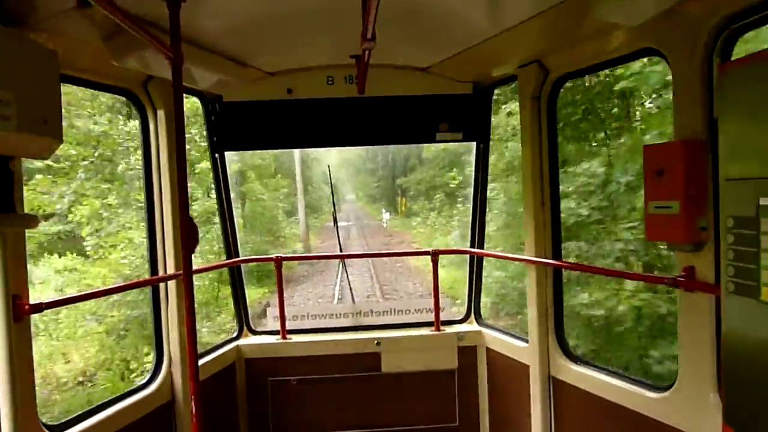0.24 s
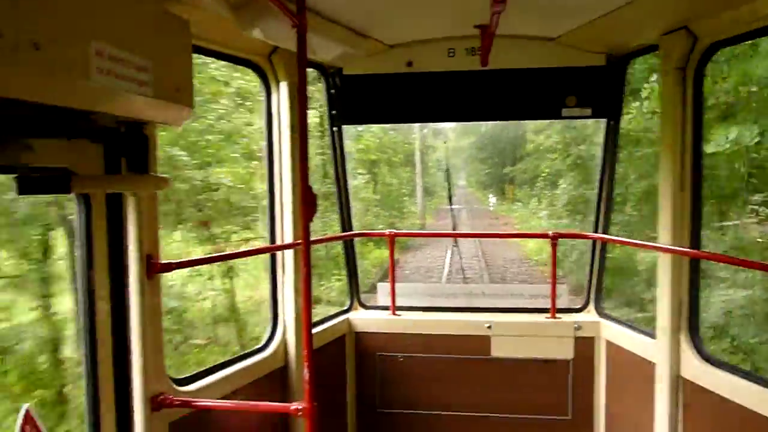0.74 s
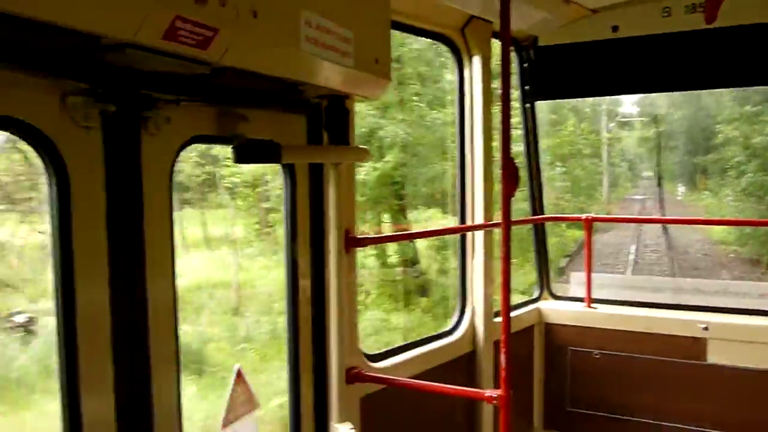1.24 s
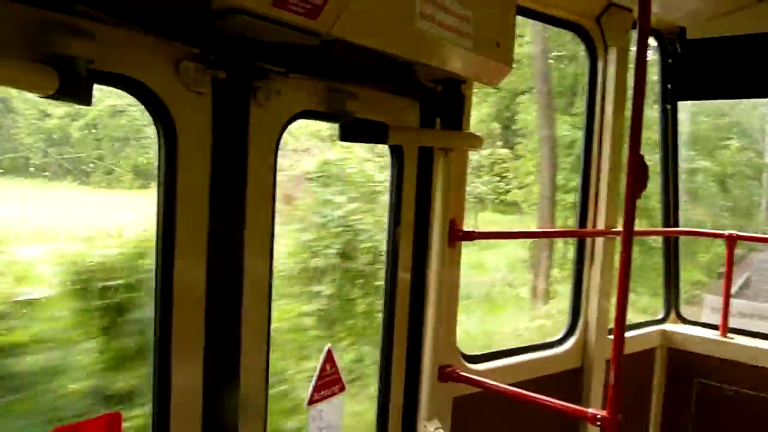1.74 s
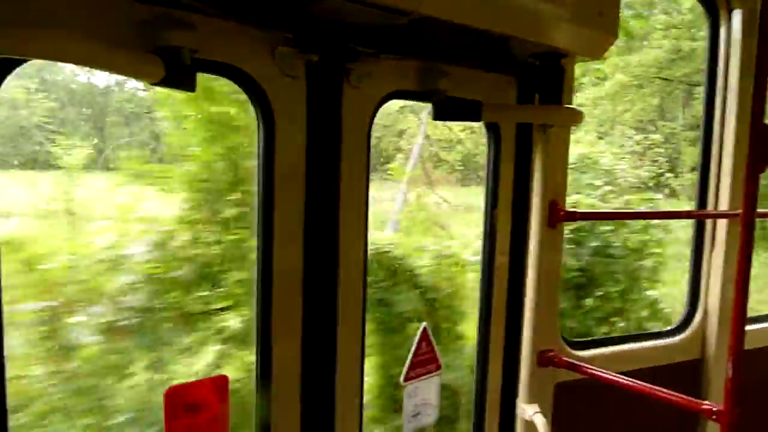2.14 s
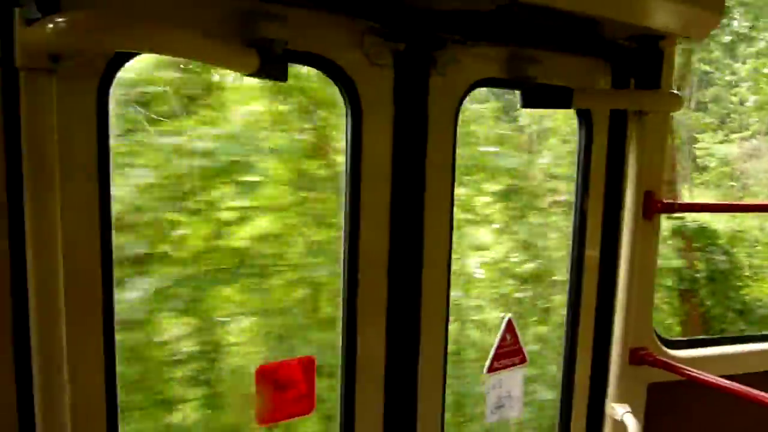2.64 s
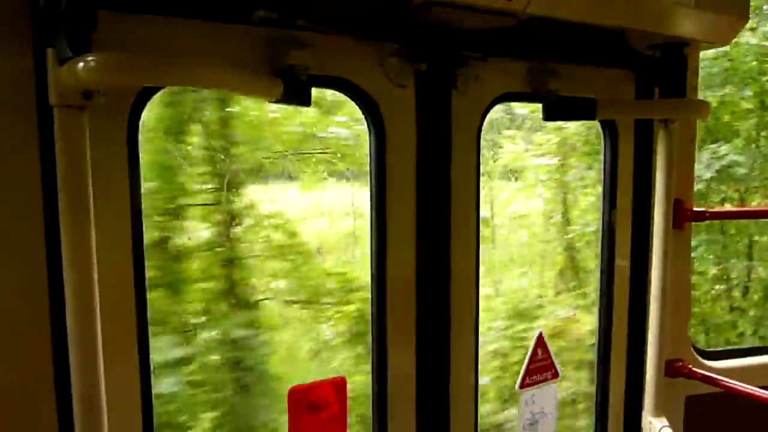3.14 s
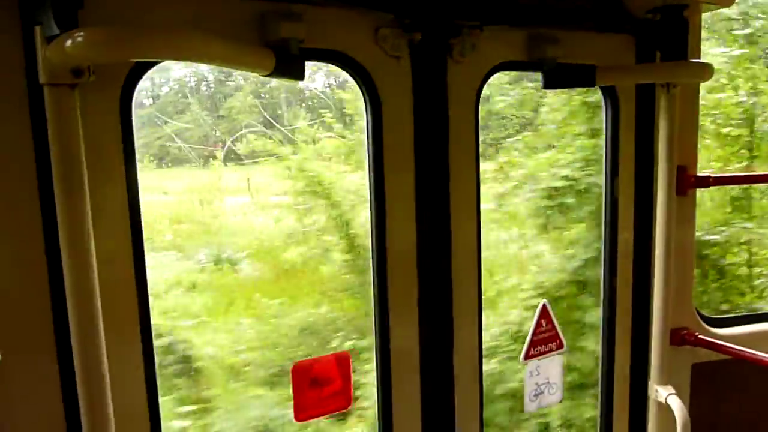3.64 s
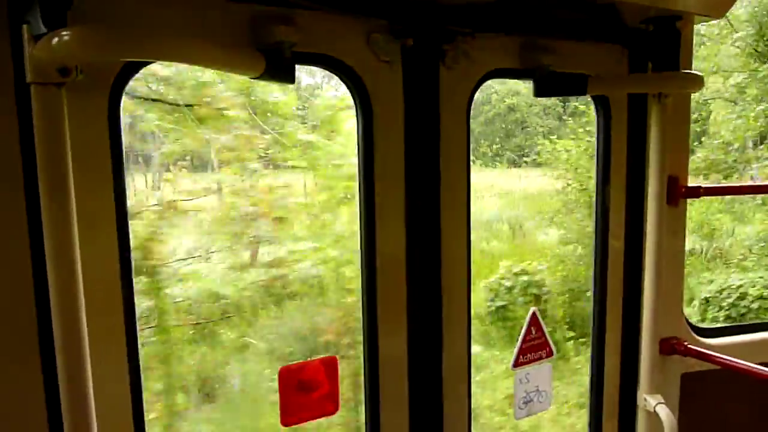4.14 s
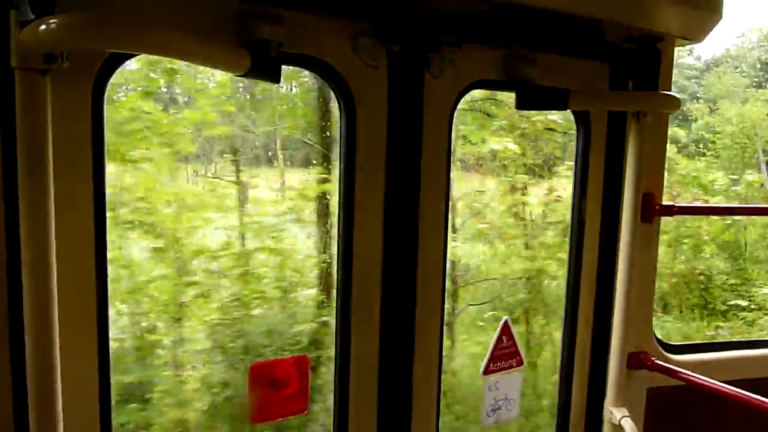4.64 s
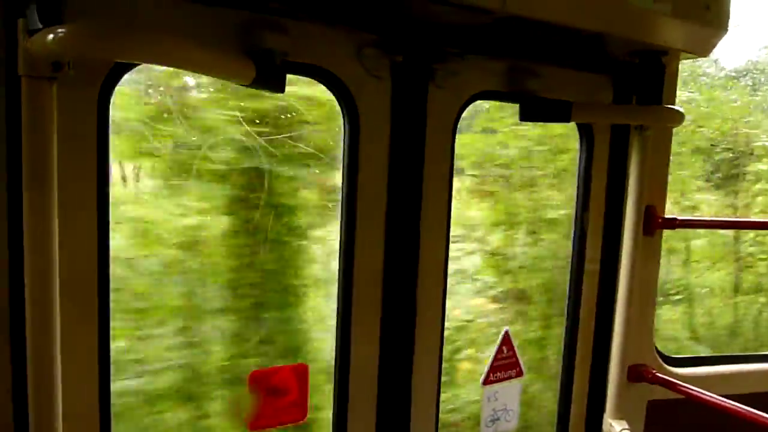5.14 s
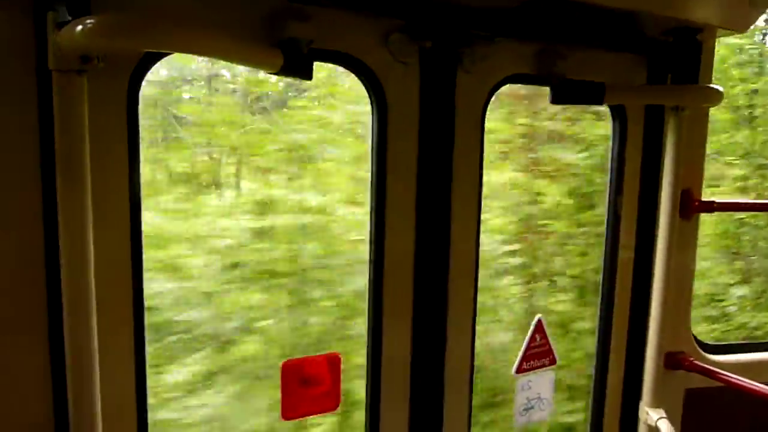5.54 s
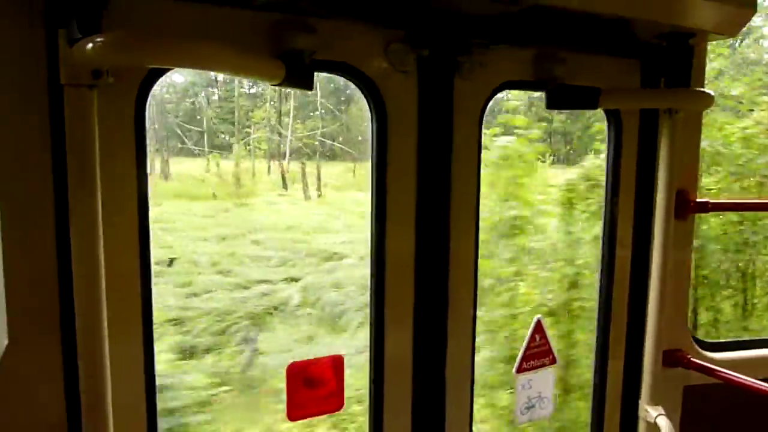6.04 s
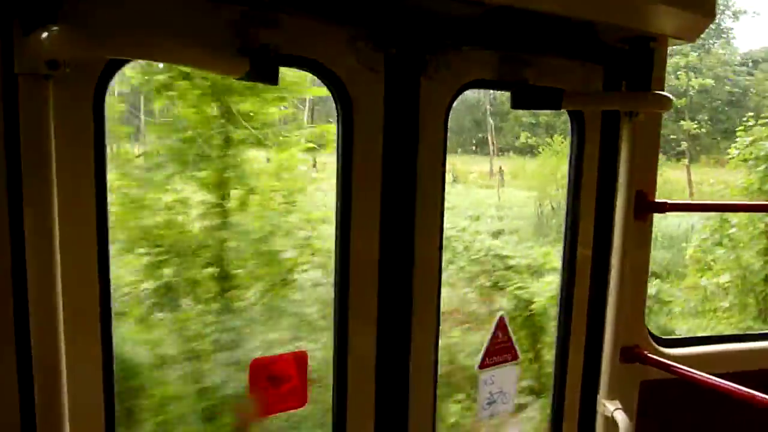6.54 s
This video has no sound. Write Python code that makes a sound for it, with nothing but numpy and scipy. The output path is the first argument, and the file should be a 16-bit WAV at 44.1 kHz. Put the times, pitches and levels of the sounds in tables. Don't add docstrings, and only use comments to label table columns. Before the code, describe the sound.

A tram runs at constant speed through woodland, heard from inside the car. Wheels on rough rail make a wide, dark roar over a wavering deep cabin boom, with loose panels murmuring and a thin, barely audible wheel whine. Wheel hiss rises midway, then eases; a short, faint squeak comes after four seconds. Passing foliage adds subtle puffs of hiss. Close, enclosed mono camera sound.

```python
import sys
import numpy as np
from scipy import signal
from scipy.fft import rfft, irfft
from scipy.io import wavfile
from scipy.ndimage import uniform_filter1d

SR = 44100
rng = np.random.default_rng(int(sys.argv[2]) if len(sys.argv) > 2 else 0)


def to_wav(s):
    ch = np.atleast_2d(s).T
    pcm = np.round(np.clip(ch, -1, 1) * 32767)
    wavfile.write(sys.argv[1], SR, pcm.astype(np.int16))


def boost(x):
    u = np.asarray(x, float) / 20
    return 10 ** u


N = 299086

# time_s, rail_roughness_db, body_shaking_db
RIDE = [(0, -2, 0), (.5, -1, -3.5), (.85, 0, -3), (1.26, 2, -1.5), (1.45, 0, -0.5), (1.75, 1, 1.5),
        (1.95, -2, 1), (2.1, -1, 0), (2.4, 3.5, 0), (2.75, 6, 0.5), (3.1, 1.5, 0), (3.5, 3, -1),
        (3.95, 3, -0.5), (4.5, 1, -1), (5.0, 0.5, -1), (5.6, -3, -2.5), (6.2, -4, -1), (6.78, -1.5, 1)]
PART_HZ = [
    170,
    600,
    2200,
    4500,
    6500,
]
PART_SHARES = [
    (0.11, 0.16, 0.47, 0.046, 1, .1),
    (0.26, 0.99, 0.98, .1, .1, 0.97),
    (0.82, 0.091, 1.0, 0.37, .02, .05),
    (0.51, .1, 0.26, 0.52, .01, .01),
    (.6, .05, 0.6, 0.61, .01, .01),
]
# frequency_hz, density_db
ROAR_SPECTRUM = [(47, -30), (80, -1), (162, -7), (387, -6.5), (477, -14), (964, -18), (1460, -25),
                 (2270, -26), (2540, -29.5), (2850, -30), (3190, -35), (3930, -38), (5640, -44),
                 (6570, -56), (7500, -68), (9750, -102), (16500, -120)]
# centre_hz, width_hz, gain_db
BODY_MODES = [(92, 11, 0.5), (125.8, 9.1, 4.5), (136, 6.4, 4.5), (157, 7.3, -0.5), (176, 38, 3),
              (198, 28, 1.5), (227, 11, -0.5), (245.3, 2.2, 4), (262.5, 5.9, 2), (294, 12, 3),
              (311, 3.2, 6), (391.5, 13, 2.5), (410, 30, 1), (444.6, 4.8, 6.5), (463, 21, -2.5),
              (580, 13, 3), (520, 25, 1.5), (610, 22, 2.5), (691, 18, 4), (780, 21, 0.5), (939, 34, 3),
              (995, 19, 3), (1080, 40, 4), (2230, 25, 2.5), (2334, 230, 3), (2370, 42, -1), (2530, 140, -2),
              (2870, 200, 2), (3880, 580, 3.5), (5360, 200, -2)]
# middle_s, length_s, level_db
TRACK_MARKS = [(.64, 0.026, 3), (1.56, 0.035, 0.5), (1.88, 0.035, 0.5), (3.18, 0.061, -2),
               (3.23, 0.024, -0.5), (3.31, .1, -5), (3.97, 0.086, 0.5), (4.09, 0.11, -1.5),
               (4.26, 0.068, 1), (4.32, 0.071, -3), (4.85, 0.046, 2.5), (5.11, 0.067, -2),
               (5.55, 0.055, 3.5), (5.64, 0.053, 1), (6.06, 0.068, -4), (6.2, 0.063, -1), (6.29, 0.04, 0)]
# middle_s, length_s, level_db
NEAR_FOLIAGE = [(0.486, 0.12, 2), (1.24, 0.26, 5.5), (1.478, 0.028, 5), (1.614, 0.25, 3), (2.286, 0.13, 2),
                (2.71, 0.11, 1), (2.817, .05, -1.5), (3.087, 0.066, 4), (3.23, 0.053, 5), (3.555, 0.12, 0),
                (3.931, 0.13, 5), (4.24, 0.12, 2), (4.365, 0.056, 1.5), (4.49, 0.048, -0.5),
                (5.418, 0.03, 3), (5.541, 0.24, 6.5), (5.805, 0.086, 6), (6.006, .06, 4),
                (6.087, 0.085, 3.5), (6.15, 1, 5.5), (6.206, 0.078, 6.5), (6.436, 0.11, 2),
                (6.605, 0.05, 6)]
# middle_s, length_s, level_db
FLOOR_HEAVES = [(0.318, 0.066, -3), (0.615, 0.11, -6), (1.249, 0.2, 0.5), (1.677, 0.11, 1),
                (2.057, 0.07, 2), (2.337, 0.09, 3.5), (2.784, 0.13, 2.5), (3.193, 0.12, -2.5),
                (3.379, .08, -1), (3.488, 0.091, 4), (3.764, 0.068, 4.5), (3.942, 0.089, 4), (4.076, .1, 0),
                (4.394, 0.25, 2.5), (4.7, 0.13, 3.5), (4.985, 0.091, 3.5), (5.187, .06, 3),
                (5.365, 0.063, 3.5), (5.65, .08, -3), (5.92, 0.29, 2.5), (6.195, .06, 0),
                (6.445, 0.08, -2.5), (6.6, .2, 1.5)]
# middle_s, length_s, level_db
WALL_KNOCKS = [(.32, .08, 2.5), (0.55, .15, 2.5), (0.787, .05, 4), (1.05, .2, 1), (1.383, .1, -2),
               (1.554, .08, 1.5), (1.79, .06, 1), (1.88, .1, -4.5), (2.047, .08, 1), (2.758, .15, -2),
               (3.05, .12, 2), (3.322, .06, 0.5), (3.422, .05, -5.5), (3.76, .1, 2), (3.979, .1, 3),
               (4.366, .1, -3.5), (4.746, .1, 1.5), (4.87, .06, 2.5), (5.039, .06, 3.5), (5.36, .1, 3),
               (5.652, .15, -2.5), (6.045, .08, 1.5), (6.172, .06, 2.5), (6.335, .08, 1.5)]
# middle_s, length_s, peak_db, pitch_hz
BOOM_SWELLS = [(0.092, 0.17, -31, 71), (0.261, 0.13, -32, 64.7), (0.451, 0.27, -34, 67.1),
               (0.621, .1, -33, 70.5), (0.796, 0.16, -30, 67), (0.953, 0.15, -32, 66),
               (1.13, 0.15, -31, 64.8), (1.449, 0.23, -28.5, 67.7), (1.588, 0.019, -34, 65.7),
               (1.771, 0.21, -30, 67.5), (1.963, 0.083, -27.5, 67.2), (2.153, 0.17, -37, 67.6),
               (2.401, 0.16, -36, 65.1), (2.575, 0.18, -35.5, 66.2), (2.766, 0.15, -28.5, 67.7),
               (2.943, 0.074, -25, 66.3), (3.198, 0.35, -25.5, 61.87), (3.481, 0.065, -42, 63.3),
               (3.642, 0.091, -27.5, 67.7), (4.003, 0.07, -25.5, 68.1), (4.159, 0.15, -31, 63.5),
               (4.307, 0.17, -25.5, 63.4), (4.683, 0.11, -28, 64.7), (4.825, 0.13, -31.5, 63.2),
               (5.081, 0.028, -22, 65.7), (5.231, 0.27, -30, 66.3), (5.421, 0.16, -29, 67.26),
               (5.579, 0.11, -24, 65.86), (5.763, 0.16, -27.5, 65.4), (6.041, 0.062, -21.5, 65.96),
               (6.268, 0.45, -32, 64.16), (6.5, .1, -34, 65.5), (6.648, 0.12, -29, 64.5),
               (6.78, 0.056, -24, 64.1)]
# centre_hz, width_hz, unevenness, level_db
HUM_MODES = [
    (218, 10, .4, -2.5),
    (548, 30, 1.5, -5.5),
    (395, 70, 2.5, -3),
    (138, 25, .8, -3),
    (290, 50, 2, -3),
    (100, 18, .8, -3),
    (255, 24, 1.2, -3),
]
# middle_s, length_s, peak_db
HUM_LOW = [(0.538, .08, -34.5), (1.023, 0.13, -41.5), (1.24, 0.094, -42), (1.657, 0.52, -37.5),
           (2.186, 0.25, -34.5), (2.75, 0.11, -45), (3.226, 0.059, -34), (3.743, 0.13, -34),
           (3.992, 0.095, -33), (4.362, 0.12, -37.5), (4.684, 0.11, -30), (5.071, 0.14, -40.5),
           (5.452, 0.24, -38.5)]
HUM_HIGH = [(.17, 0.23, -44), (.44, 0.057, -45), (1.62, 0.36, -51), (2.15, .12, -43), (2.799, 0.098, -44),
            (3.23, 0.039, -34), (3.382, 0.067, -29), (3.74, 0.088, -50), (3.98, 0.07, -29),
            (4.24, 0.05, -33.5), (5.6, 0.16, -42), (5.85, 0.076, -38), (6.14, 0.15, -40.5),
            (6.4, 0.17, -39), (6.72, 0.1, -45)]
HUM_MID = [(.3, 0.091, -50), (.55, 0.26, -36.5), (.95, 0.091, -42), (1.32, 0.32, -43), (2.05, 0.13, -37),
           (3.0, 0.24, -52), (3.45, 0.11, -40), (4.0, 0.11, -52), (4.25, 0.11, -49), (4.9, 0.22, -40.5),
           (5.3, 0.11, -64), (6.3, 0.16, -37.5)]
HUM_DEEP = [(.5, 0.19, -37), (1.3, 0.091, -26), (2.1, 0.15, -51), (2.55, 0.21, -32.5), (2.97, 0.22, -35),
            (3.55, 0.1, -33.5), (3.8, 0.14, -38), (4.4, 0.11, -29.5), (4.68, 0.09, -44), (5.03, .1, -33),
            (6.3, 0.099, -46)]
HUM_DOOR = [(.45, 0.14, -51), (0.86, 0.13, -32.5), (1.677, 0.17, -33.5), (2.346, .15, -44),
            (2.726, .16, -37.5), (3.604, 0.16, -37), (3.85, 0.23, -43.5), (4.005, 0.056, -38),
            (4.819, .14, -36), (5.351, .15, -37), (6.647, 0.25, -35.5)]
HUM_FLOOR = [(.7, .08, -37), (1.5, 0.071, -36), (1.78, 0.19, -29), (2.76, 0.12, -38), (3.55, 0.11, -45),
             (3.95, .15, -35), (4.6, .12, -41), (5.5, 0.17, -41.5), (6.05, .1, -43), (6.72, .1, -36)]
HUM_SEAT = [(1.1, .12, -42), (1.75, 0.13, -40), (2.3, 0.13, -41), (2.75, 0.31, -39.5), (3.4, 0.23, -44.5),
            (3.95, 0.22, -38), (4.55, 0.13, -38), (5.35, 0.18, -37), (5.9, .12, -41)]
WHEEL_HZ = [
    1584.6,
    1900.6,
]
# middle_s, length_s, peak_db
SING_LOW = [(0.05, 0.6, -49.5), (.45, 0.42, -60), (0.752, .25, -58), (1.05, 0.1, -54), (1.402, 0.25, -52),
            (1.72, .2, -62), (2.468, 0.12, -51), (2.72, .1, -57), (2.97, 0.13, -52), (3.247, 0.16, -54),
            (3.678, 0.21, -45), (3.864, .16, -50), (4.2, 0.21, -48), (4.403, 0.21, -51.5),
            (4.65, 0.37, -56), (4.9, .25, -54.5), (5.098, 0.22, -49), (5.235, 0.15, -50),
            (5.452, 0.37, -48.5), (5.801, 0.19, -50.5), (6.021, .3, -52.5), (6.301, 0.22, -54),
            (6.521, 0.14, -52), (6.717, 0.19, -50.5)]
SING_HIGH = [(0.46, 0.2, -54), (.7, .3, -58.5), (1.0, 0.15, -55), (1.2, 0.26, -46.5), (1.39, .16, -49),
             (1.58, 0.25, -54.5), (1.85, .15, -57), (2.25, 0.21, -53), (2.55, 0.2, -48.5),
             (2.76, 0.14, -54), (3.55, 0.2, -47.5), (3.75, .25, -50), (3.94, 0.1, -46), (4.22, 0.3, -46.5),
             (4.5, .3, -55.5), (4.78, .15, -54), (4.91, 0.12, -50), (5.35, 0.25, -55), (5.65, .3, -57),
             (6.4, .2, -56), (6.62, 0.2, -49), (6.76, .1, -54)]
# slip_s, peak_db
SLIPS = [(4.336, -53), (4.3566, -51), (4.372, -66), (4.3875, -45), (4.402, -53), (4.418, -54),
         (4.4323, -54), (4.449, -49), (4.4618, -50), (4.4815, -45), (4.497, -65), (4.509, -59),
         (4.522, -57), (4.546, -62), (4.575, -57), (4.6001, -56), (4.6194, -62), (4.69, -68)]
# middle_s, length_s, peak_db
TWIG_SWISHES = [(5.415, .02, -60), (5.47, .05, -55), (5.55, .08, -52), (5.72, .12, -60), (5.99, .04, -63),
                (6.1, 0.055, -61), (6.21, .04, -58), (6.33, .06, -58), (6.45, .05, -62)]


def evened(x):
    return x / np.sqrt(np.mean(abs(x) ** 2) + 1e-20)


def columns(rows, t):
    time_s, *values = np.transpose(rows)
    return [np.interp(t, time_s, v) for v in values]


def bumps(rows, heights, t):
    grid = np.linspace(t[0], t[-1], num=3000)
    humps = [np.exp(-abs(2 * (grid - row[0]) / row[1]) ** 2.0) for row in rows]
    return np.interp(t, grid, heights @ np.array(humps))


def level_bumps(rows, t):
    return bumps(rows, np.transpose(rows)[2], t)


def spells(rows, t, rest_db):
    return boost(rest_db) + bumps(rows, boost(np.transpose(rows)[2]), t)


def drift(width_hz):
    r = np.exp(-np.pi * width_hz / SR)
    z = rng.standard_normal(N + SR) + 1j * rng.standard_normal(N + SR)
    for _ in range(2):
        z = signal.lfilter([1], [1, -r], z)
    return evened(z[SR:])


def note(hz, fuzz, width_hz):
    turn = np.exp(2j * np.pi * np.cumsum(hz * np.ones(N)) / SR)
    return evened((turn * (1 + fuzz * drift(width_hz))).real)


def noise_band(centre_hz, width_hz):
    hz = np.fft.rfftfreq(N, 1 / SR)
    band = np.exp(-((hz - centre_hz) / width_hz) ** 2)
    return evened(irfft(rfft(rng.standard_normal(N)) * band, N))


def roar(level_db=-29, patchy_db=0.73, jolt_db=0.13):
    size, hop = 1024, 256
    frames = N // hop + 16
    hz = np.fft.rfftfreq(size, 1 / SR)
    real, imag, patches = rng.standard_normal((frames, len(hz), 3)).T
    t = (np.arange(frames) * hop - size) / SR
    event_tables = (TRACK_MARKS, NEAR_FOLIAGE, FLOOR_HEAVES, WALL_KNOCKS)
    events_db = [level_bumps(rows, t) for rows in event_tables]
    parts_db = np.array(PART_SHARES) @ np.array(columns(RIDE, t) + events_db)
    blend = [np.interp(np.log(hz + 1), np.log(PART_HZ), one) for one in np.eye(len(PART_HZ))]
    patches = uniform_filter1d(patches, size=10, axis=0)
    patches = evened(uniform_filter1d(patches, size=14, axis=1))
    jolts = evened(uniform_filter1d(rng.standard_normal(frames), size=8))
    frame_db = np.transpose(blend) @ parts_db + patchy_db * patches + jolt_db * jolts
    spectra = (real + 1j * imag) * boost(frame_db)
    shaking = signal.istft(spectra, nperseg=size, noverlap=size - hop)[1]

    hz = np.fft.rfftfreq(len(shaking), 1 / SR)
    curve_hz, curve_db = np.transpose(ROAR_SPECTRUM[1:])
    colour_db = np.interp(np.log(hz + 1), np.log(curve_hz), curve_db)
    for mode_hz, width_hz, gain_db in BODY_MODES:
        colour_db += gain_db / (1 + (2 * (hz - mode_hz) / width_hz) ** 2)
    coloured = irfft(rfft(shaking) * boost(colour_db), len(shaking))
    return boost(level_db) * evened(coloured[size:size + N])


def boom(t, gain_db=-3, rest_db=-46):
    middle_s, _, _, pitch_hz = np.transpose(BOOM_SWELLS)
    air = note(np.interp(t, middle_s, pitch_hz), fuzz=.22, width_hz=25)
    return boost(gain_db) * spells(BOOM_SWELLS, t, rest_db) * air


def hum(t, rest_db=-59):
    tables = (HUM_LOW, HUM_HIGH, HUM_MID, HUM_DEEP, HUM_DOOR, HUM_FLOOR, HUM_SEAT)
    out = np.zeros(N)
    for (hz, width_hz, fuzz, level_db), rows in zip(HUM_MODES, tables):
        out += boost(level_db) * spells(rows, t, rest_db) * note(hz, fuzz, width_hz)
    return out


def wheels(t, gain_db=-3.5, rest_db=-69, waver_hz=2):
    out = np.zeros(N)
    for hz, rows in zip(WHEEL_HZ, (SING_LOW, SING_HIGH)):
        tone = note(hz + waver_hz * drift(3).real, fuzz=.22, width_hz=22)
        out += spells(rows, t, rest_db) * tone
    return boost(gain_db) * out


def squeak(t, gain_db=-2):
    base_hz, rise_hz, tight_s, tighten_s = 5360, 50, 4.428, .018
    swell_s, scatter_hz, sister_hz, sister_share = .0046, 7, 65, .3
    tight = (1 + np.tanh((t - tight_s) / tighten_s)) / 2
    turns = np.cumsum(base_hz + rise_hz * tight) / SR
    out = np.zeros(N)
    chances = rng.standard_normal((len(SLIPS), 3))
    for (slip_s, peak_db), (pitch, phase, sister_phase) in zip(SLIPS, chances):
        centre = round(slip_s * SR)
        at = slice(centre - SR // 20, centre + SR // 10)
        u = np.maximum(t[at] - slip_s + 1.3 * swell_s, 0) / swell_s
        turn = 2 * np.pi * (turns[at] + scatter_hz * pitch * u * swell_s)
        sister_turn = turn - 2 * np.pi * sister_hz * u * swell_s + 2 * sister_phase
        sister = sister_share * (1 - tight[at] / 2) * np.cos(sister_turn)
        ring = np.cos(turn + phase / 2) + sister
        out[at] += boost(peak_db + gain_db) * (u / 2) ** 2 * np.exp(2 - u) * ring
    return np.sqrt(2) * out


def trees(t, open_db=-80):
    hiss = noise_band(centre_hz=5900, width_hz=900)
    return boost(open_db + 1.2 * level_bumps(NEAR_FOLIAGE, t)) * hiss


def twigs(t, rest_db=-90):
    return spells(TWIG_SWISHES, t, rest_db) * noise_band(centre_hz=4300, width_hz=1000)


def scene():
    t = np.arange(N) / SR
    mix = roar() + boom(t) + hum(t) + wheels(t) + squeak(t) + trees(t) + twigs(t)
    return mix[None]


def low_pass(x):
    return signal.sosfilt(signal.butter(12, 7650, fs=SR, output="sos"), x)


def record(dry):
    knee, bass_cut_hz, top_hz, pad = .25, 41, 7350, 4096
    soft = knee * np.tanh(dry / knee)
    soft = np.pad(soft, [(0, 0), (pad, pad)], "reflect", reflect_type="odd")
    hz = np.fft.rfftfreq(N + 2 * pad, 1 / SR) + 1
    response = 1 / np.sqrt((1 + (bass_cut_hz / hz) ** 9.1) * (1 + (hz / top_hz) ** 50))
    mix = irfft(rfft(soft) * response, N + 2 * pad)[:, pad:-pad]
    return low_pass(mix)


dry = scene()
out = record(dry)
to_wav(out)
```